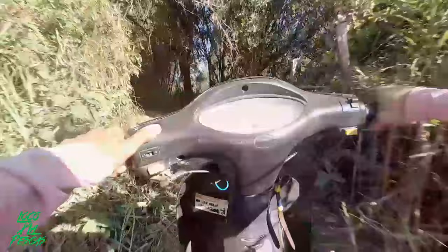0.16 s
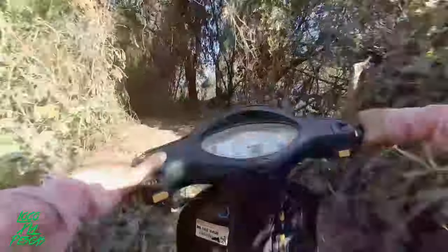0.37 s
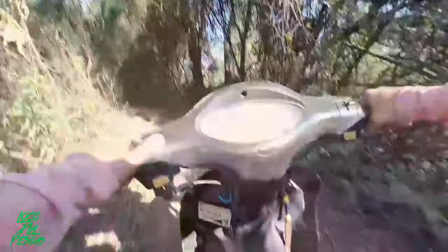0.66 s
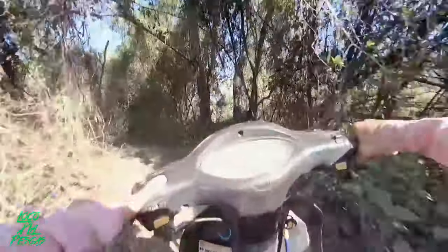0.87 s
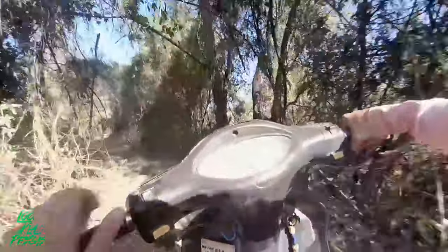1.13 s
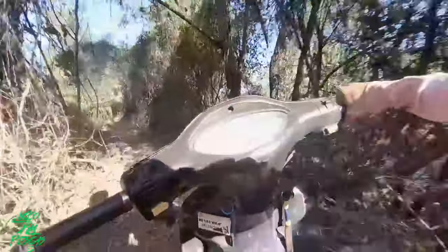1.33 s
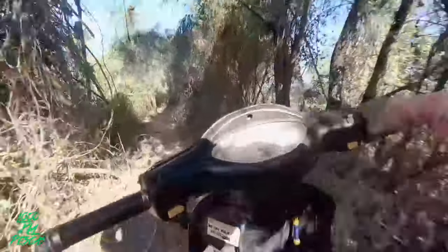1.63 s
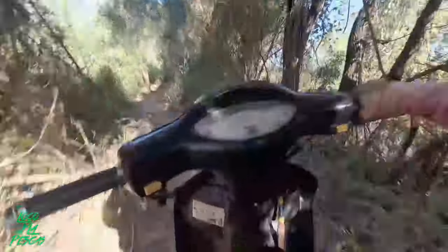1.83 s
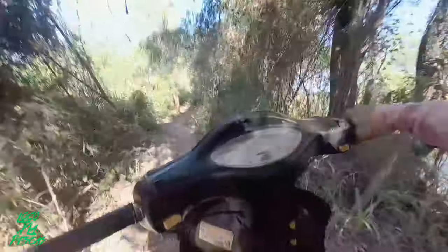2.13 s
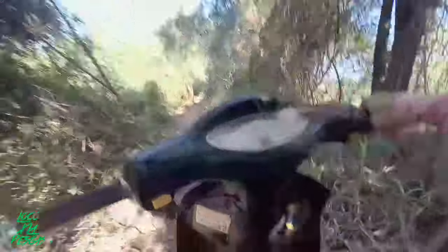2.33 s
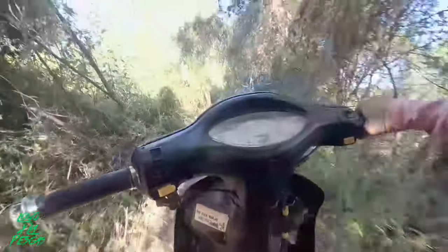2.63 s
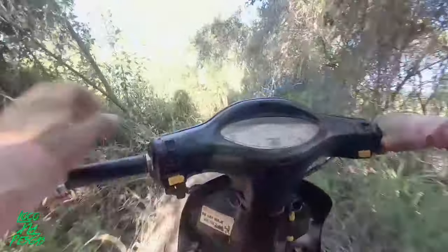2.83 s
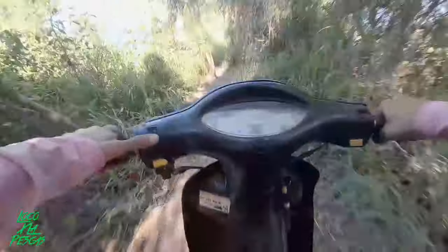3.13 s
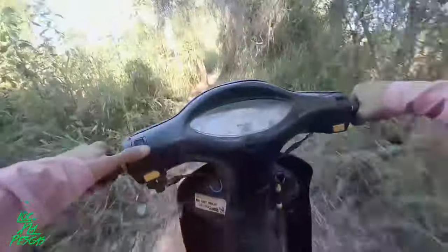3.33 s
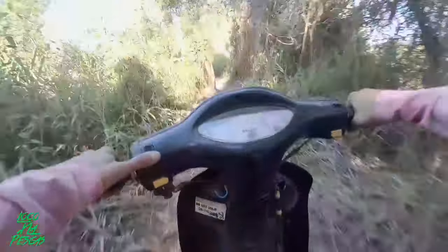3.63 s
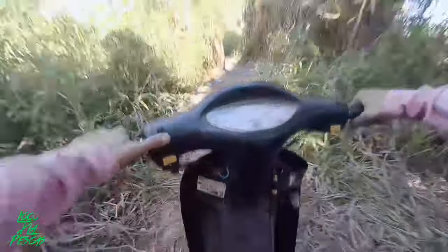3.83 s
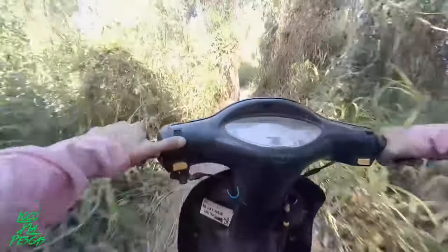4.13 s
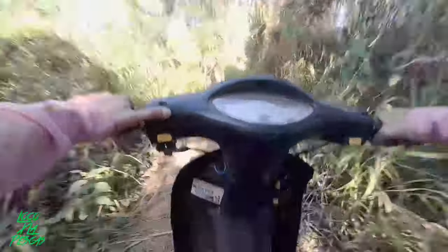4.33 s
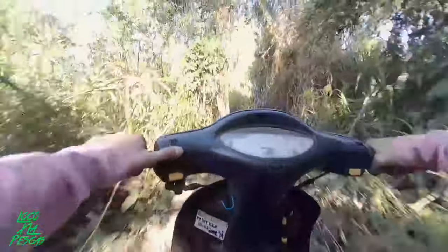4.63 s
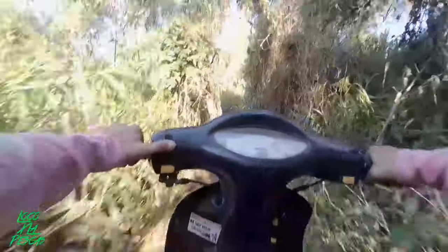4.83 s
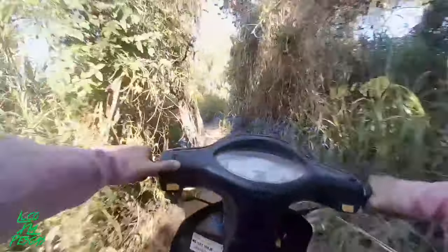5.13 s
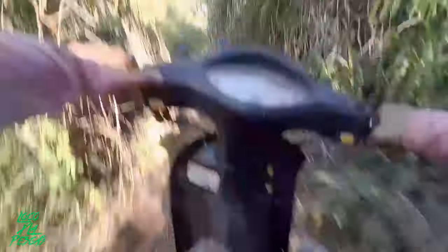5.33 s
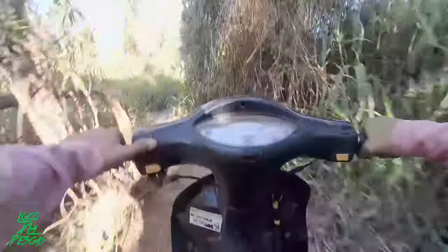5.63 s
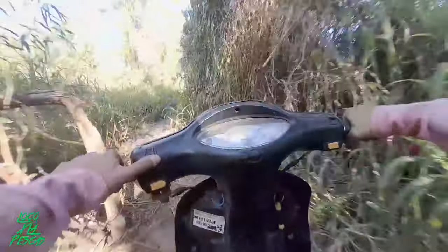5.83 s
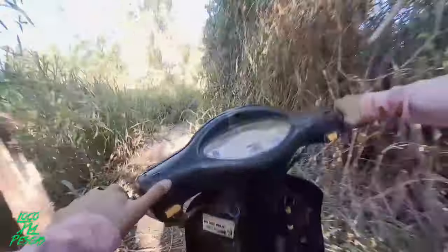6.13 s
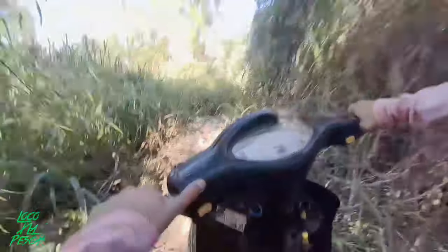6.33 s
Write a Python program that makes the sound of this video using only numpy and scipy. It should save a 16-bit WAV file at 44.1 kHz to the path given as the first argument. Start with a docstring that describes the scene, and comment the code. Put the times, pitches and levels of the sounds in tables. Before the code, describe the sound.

A small four-stroke scooter putters along an overgrown dirt track, heard close up from the rider's chest. Low exhaust thumps, rumbling tyres, hissing dry grass and jingling loose metal run throughout. In the first half second the engine slows, with a few booming beats and hollow panel knocks. It falters around 0.6 seconds and again near 1.6, where twigs snap and a bump shakes the panels. From 2 seconds the engine speeds up, holding until about 3, when ruts bring a cluster of knocks and branches swish past. It then sinks back gradually, with more swishes and bright snaps around 4.4 seconds and a sharp snap and knock at 5.2. The engine rises again from about 5.8 seconds to the end at 6.5. Faint, very high squeaks come now and then. The right side is muffled and boomy, while the brush sounds crisper on the left.

```python
"""A small four-stroke scooter putters along an overgrown dirt track, heard from the rider's chest.
From the start, each firing thumps the exhaust, tyres rumble, dry grass hisses and loose metal jingles.
As the engine slows, a few firings nearly fail, twigs snap, bumps shake the panels, branches swish past
and something squeaks faintly. The engine speeds up after two seconds, sinks back, and speeds up again
near the end. All along, the right microphone is muffled and boomy."""
import sys
import numpy as np
from scipy import signal
from scipy.fft import rfft, irfft
from scipy.io import wavfile

SR = 44100
rng = np.random.default_rng(int(sys.argv[2]) if len(sys.argv) > 2 else 0)


def log_audio(samples):
    """Write samples as a 16-bit WAV file to the path given in sys.argv[1]."""
    # one column per channel
    frames = np.atleast_2d(samples).T
    # limit to full scale, then quantise
    limited = np.clip(frames, -1, 1)
    pcm = np.round(limited * 32767).astype(np.int16)
    wavfile.write(sys.argv[1], SR, pcm)


N = 286209
TIME = np.arange(N) / SR

# How fast the engine runs. Each row: time in seconds, firings per second.
ENGINE_SPEED = [(0.0, 22.73), (0.3, 17.59), (0.46, 15.8), (1.52, 16.18), (1.58, 14.14), (2.08, 14.2),
                (2.3, 18.18), (2.7, 20.78), (3.14, 20.42), (3.4, 17.61), (4.06, 18.6), (4.68, 15.72),
                (5.42, 14.24), (5.6, 16.18), (5.72, 14.33), (6.04, 18.14), (6.1, 16.55), (6.49, 21.7)]
# Firings that burn harder and boom. Each row: time in seconds, relative boom level in dB.
HEAVY_FIRINGS = [(.07, -6), (.16, -8), (.27, -13), (.82, -11), (.95, -10), (2.0, -27), (5.33, -12)]
# The tone of plants rubbing the fairing (the plastic shell). Each row: frequency in Hz, gain in dB.
PLANT_TONE = [(400, -10), (1000, -5.5), (1500, 2.5), (1850, -5), (2300, 2.5), (3000, -1), (4000, -2.5),
              (4800, -2.5), (5600, -3), (6400, -6), (7500, -12.5), (8800, -20), (11500, -11.5),
              (15500, -14)]
# Branches whipping past. Each row: peak time in seconds, half-width in seconds, relative level in dB.
BRANCHES = [(.27, 0.019, -44.5), (.52, 0.013, -47.5), (1.6, .02, -56), (1.815, 0.038, -42.5),
            (2.403, 0.011, -37), (2.58, 0.022, -44), (2.95, .016, -43), (3.07, 0.015, -44),
            (3.22, 0.013, -47), (4.34, 0.016, -41.5), (4.46, 0.014, -46), (4.6, 0.015, -48.5),
            (5.254, 0.025, -38.5), (5.38, 0.024, -41)]


def from_db(db):
    """Turn decibels into a number to multiply by."""
    return 10 ** (np.asarray(db) / 20)


def unit_power(x):
    """Scale a signal so its average power is 1."""
    return x / np.sqrt(np.mean(x ** 2) + 1e-20)


def curve(rows):
    """Join rows of time and value with straight lines."""
    return np.interp(TIME, *np.transpose(rows))


def drift(rate_hz):
    """A slow random wander, about 1 in size."""
    pole = np.exp(-80 * np.pi * rate_hz / SR)
    slow = signal.lfilter([1], [1, -2 * pole, pole * pole], rng.standard_normal(N // 40 + 2002))[2000:]
    return np.interp(np.arange(N) / 40, np.arange(len(slow)), unit_power(slow))


def tone_gains(tone, size):
    """Spread rows of Hz and dB into one gain for each frequency of a spectrum."""
    hz, db = np.transpose(tone)
    bins = np.maximum(np.arange(size // 2 + 1) * SR / size, 1)
    return from_db(np.interp(np.log(bins), np.log(hz), db))


def click_response(tone, size=4096):
    """How a body with this tone answers one click."""
    cepstrum = irfft(np.log(tone_gains(tone, size)))
    # folding onto the first half keeps any sound from coming before the click
    cepstrum[1:size // 2] *= 2
    cepstrum[size // 2 + 1:] = 0
    return irfft(np.exp(rfft(cepstrum)))


def colour(x, tone):
    """Pass a sound through a body with this tone."""
    return signal.fftconvolve(x, click_response(tone))[:N]


def ring(clicks, hz, t60):
    """Each click starts a pure note that falls by 60 dB in t60 seconds."""
    decay, angle = from_db(-60 / (t60 * SR)), 2 * np.pi * hz / SR
    return signal.lfilter([0, np.sin(angle)], [1, -2 * decay * np.cos(angle), decay ** 2], clicks + 1e-18)


def fade(clicks, t60):
    """Each click makes a level jump up, then fall by 60 dB in t60 seconds."""
    return signal.lfilter([1], [1, -from_db(-60 / (t60 * SR))], clicks + 1e-18)


def clicks_at(rows):
    """One click for each row of seconds and dB."""
    seconds, db = np.transpose(rows)
    return np.bincount(np.clip(seconds * SR, 0, N - 1).astype(int), from_db(db), N)


def grains(per_s, spread_db):
    """Tiny random contacts, many weak and a few strong."""
    sizes = from_db(spread_db * np.minimum(rng.exponential(1, N), 4))
    return unit_power(sizes * rng.choice([-1, 1], N) * (rng.random(N) < per_s / SR))


def swells(rows, stretch=1):
    """A smooth rise and fall for each row of peak time, half-width and dB."""
    return sum(from_db(db) * np.exp(-np.minimum(((TIME - peak) / (stretch * width)) ** 2, 40))
               for peak, width, db in rows)


def firings(scatter_db, heavy_db):
    """One click per engine cycle, as strong as the throttle allows; some falter, some burn harder."""
    # How far the throttle is open. Each row: time in seconds, firing strength in dB.
    throttle = [(0.0, -2), (0.45, -7), (1.3, -2.5), (1.86, -1), (2.05, 3), (2.6, 2), (3.3, -2.5),
                (3.8, -.5), (4.25, -2), (5.0, -1.2), (5.65, -0.5), (5.88, 3), (6.15, .5), (6.49, 4)]
    # Firings that nearly fail. Each row: time in seconds, change of strength in dB.
    misfires = [(.02, -1.5), (.11, -6.5), (.385, -5), (.57, -4.5), (.64, -7), (.70, -5), (1.58, -13.5),
                (1.715, -9.5), (3.31, -7.5), (5.2, -8)]
    cycles = np.cumsum(curve(ENGINE_SPEED)) / SR
    at = np.flatnonzero(np.diff(np.floor(cycles + .5)))
    db = curve(throttle)[at] + scatter_db * rng.standard_normal(N)[at]
    for when, change_db in misfires:
        db[np.argmin(abs(at / SR - when))] += change_db
    for when, _ in HEAVY_FIRINGS:
        db[np.argmin(abs(at / SR - when))] += heavy_db
    return clicks_at(np.transpose([at / SR, db]))


def exhaust(fired, scatter_db, sway_db, left_lead_s):
    """Each firing makes the silencer ring, never twice quite alike."""
    # The silencer's notes. Each row: pitch in Hz, level in dB, ring time in seconds,
    # left level minus right level in dB.
    notes = [(89.4, -14, 0.12, -11), (121.6, -3.5, 0.14, -17.5), (205.9, -5, 0.033, -14),
             (246.9, -15, 0.099, -11), (250.9, -29, 0.31, -2)]
    left, right = np.zeros((2, N))
    for k, (hz, db, t60, left_db) in enumerate(notes):
        pushes = fired * from_db(db + scatter_db * rng.standard_normal(N))
        note = (-1) ** k * ring(pushes, hz, t60)  # neighbouring notes swing opposite ways
        # the swaying rider shades the left microphone more or less
        left += from_db(left_db + sway_db * drift(7.8)) * note
        right += note
    # the valve opens gradually, so the thump has no sharp edge
    soften = signal.butter(2, 700, fs=SR, output="sos")
    return signal.sosfilt(soften, [np.interp(TIME + left_lead_s, TIME, left), right])


def boom(fired, usual_db, db_per_speed, left_db):
    """Puffs of gas carry more deep bass when the engine runs slowly; heavy ones get an extra push."""
    at = np.flatnonzero(fired)
    speed = curve(ENGINE_SPEED)
    pushes = fired * from_db(usual_db + db_per_speed * (speed - speed.mean()))
    for when, db in HEAVY_FIRINGS:
        pushes[at[np.argmin(abs(at / SR - when))]] += from_db(db)
    # the deep swell of gas builds up just behind the pipe's ringing
    bass_band = signal.butter(2, [55, 120], "band", fs=SR, output="sos")
    deep = signal.sosfilt(bass_band, ring(pushes, hz=79.5, t60=.05))
    return np.array([from_db(left_db) * deep, deep])


def chuff(fired, level_db, rise_s, t60):
    """Gas noise and engine clatter swell after each firing and die away."""
    # The tone of the gas and clatter. Each row: frequency in Hz, gain in dB.
    gas_tone = [(40, -45), (150, -16.5), (350, 15), (600, 2.5), (1000, -20), (2200, -10), (4000, -14),
                (9000, -69)]
    flow = fade(fade(fired, rise_s), t60)
    return from_db(level_db) * unit_power(flow * colour(rng.standard_normal(N), gas_tone))


def ground_db(smooth_track_db=-43.5):
    """How hard the tyres drum: the even track plus a swell over each rut."""
    # Ruts and roots. Each row: peak time in seconds, half-width in seconds, relative level in dB.
    ruts = [(.08, 0.11, -38), (.3, 0.085, -38.5), (.92, 0.034, -42.5), (1.61, 0.023, -37.5),
            (2.05, 0.34, -46.5), (2.54, 0.034, -42), (2.99, 0.079, -35.5), (3.22, 0.084, -40),
            (4.17, 0.16, -40), (5.3, 0.065, -39)]
    return 20 * np.log10(np.hypot(from_db(smooth_track_db), swells(ruts)))


def tyre_rumble(gain_db, lumpy_db):
    """Tyres drum on the dirt and set the bodywork trembling."""
    # The tone of tyres and bodywork. Each row: frequency in Hz, gain in dB.
    rumble_tone = [(20, -30), (60, 6.5), (130, -6), (230, 4), (275, -6), (340, 1.5), (420, -2.5), (520, -1),
                   (650, -7.5), (950, -15.5), (1450, -24), (1900, -24.5), (4000, -44.5)]
    contacts = grains(per_s=3000, spread_db=2.0) * from_db(lumpy_db * drift(11.0))
    return from_db(ground_db() + gain_db) * unit_power(colour(contacts, rumble_tone))


def plants_db():
    """How hard plants press on the fairing: the grass plus the leaves of each branch."""
    # How thickly grass crowds the track. Each row: time in seconds, relative level in dB.
    grass = [(0.0, -53), (1.2, -56.5), (2.2, -51.5), (2.8, -56), (3.3, -51.5), (3.9, -53.5), (4.5, -50.5),
             (5.1, -52.5), (5.75, -52.5), (6.2, -55.5), (6.49, -54)]
    leaves = from_db(-6.5) * swells(BRANCHES, stretch=2.02)  # softer and longer than the branch's whip
    return 20 * np.log10(np.hypot(from_db(curve(grass)), leaves))


def grass_hiss(gain_db, crackle_db, clump_db):
    """Blades of grass hiss along the fairing in clumps while dry stalks crackle."""
    rub = rng.standard_normal(N) + from_db(crackle_db) * grains(per_s=610, spread_db=2.5)
    # each stalk catches at once and slides off
    catches = unit_power(fade(grains(per_s=130, spread_db=1.5) ** 2, t60=0.043))
    clumps = from_db(clump_db * catches.clip(0, 4))
    return from_db(plants_db() + gain_db) * unit_power(colour(rub * clumps, PLANT_TONE))


def leaf_fizz(level_db, follow, uneven_db):
    """Fine leaves add a thin, high fizz that changes less than the coarse grass."""
    pressure_db = plants_db()
    rub = rng.standard_normal(N) + grains(per_s=250, spread_db=0.5)
    thin = signal.sosfilt(signal.butter(4, 11500, "high", fs=SR, output="sos"), rub)
    change_db = follow * (pressure_db - pressure_db.mean()) + uneven_db * drift(8.7)
    return from_db(level_db + change_db) * unit_power(thin)


def metal_rattle(level_db, uneven_db, follow_plants, follow_ground):
    """Loose fittings jingle all the time, harder where plants hit and over the ruts."""
    # Loose metal parts. Each row: pitch in Hz, relative level in dB, ring time in seconds.
    fittings = [(1183, 2, 0.022), (1453, 2.5, 0.022), (2157, 1.5, 0.02), (2446, -2, 0.011),
                (2950, -8.5, 0.012), (4660, -1, 0.054), (5060, 2.5, 0.008), (6350, 0.5, 0.013)]
    shake_db = follow_plants * plants_db() + follow_ground * ground_db()
    jingle = np.zeros(N)
    for hz, db, t60 in fittings:
        strength = from_db(db + uneven_db * drift(3.2))
        jingle += strength * unit_power(ring(grains(per_s=140, spread_db=2.0), hz, t60))
    return from_db(level_db + shake_db - shake_db.mean()) * unit_power(jingle)


def blows(rows, tone, gain_db, t60):
    """Each blow is a short burst of noise through the struck body."""
    chatter = rng.standard_normal(N) * fade(clicks_at(rows), t60)
    return from_db(gain_db) * colour(chatter, tone) / np.linalg.norm(click_response(tone))


def twig_snaps(gain_db, t60):
    """Twigs and grit strike the bodywork with a bright snap."""
    # The strikes. Each row: start in seconds, relative level in dB.
    strikes = [(0.118, -48), (1.5263, -53), (1.5808, -47), (1.6013, -48), (1.6631, -50), (2.3296, -47),
               (2.4877, -44.5), (2.9287, -66), (3.5563, -51), (3.906, -46.5), (4.1599, -48.5),
               (4.3939, -43), (4.504, -47), (5.243, -38.5), (5.4924, -45), (5.624, -44), (5.8207, -44.5),
               (5.944, -48), (6.4307, -45.5)]
    # The tone of a snap. Each row: frequency in Hz, gain in dB.
    snap_tone = [(500, -26), (2300, -1), (3800, 2), (5000, 9.5), (6400, 3.5), (8500, -11), (12000, -4),
                 (15500, -17)]
    return blows(strikes, snap_tone, gain_db, t60)


def panel_knocks(gain_db, t60):
    """Bumps shake the panels with a hollow knock."""
    # The bumps. Each row: start in seconds, relative level in dB.
    bumps = [(0.126, -35.5), (0.273, -26.5), (1.606, -33.5), (2.98, -30), (3.019, -38), (3.073, -33),
             (3.203, -36), (5.244, -37)]
    # The tone of the panels. Each row: frequency in Hz, gain in dB.
    panel_tone = [(120, -58), (350, 1), (750, 11.5), (1100, -1.5), (2400, -0.5), (4000, -30), (9000, -37)]
    return blows(bumps, panel_tone, gain_db, t60)


def branch_swishes(gain_db):
    """A branch drags over the plastic as a short rush of tiny contacts."""
    rub = colour(grains(per_s=4300, spread_db=1.5), PLANT_TONE)
    return from_db(gain_db) * swells(BRANCHES) * unit_power(rub)


def squeaks(gain_db, hz, t60):
    """Light rubbing makes metal sing one high note in short swells."""
    # The rubs. Each row: peak time in seconds, half-width in seconds, relative level in dB.
    rubs = [(0.549, 0.061, -51), (1.595, 0.023, -52), (3.06, .02, -49), (3.89, 0.031, -52),
            (4.11, 0.041, -54), (4.73, 0.037, -54)]
    return from_db(gain_db) * swells(rubs) * unit_power(ring(rng.standard_normal(N), hz, t60))


def two_mics(source, alike, lag_s=.00025):
    """Left and right hear partly the same sound; the right one is later and muffled."""
    # The covered right microphone. Each row: frequency in Hz, gain compared with the left in dB.
    covered_tone = [(60, 5.5), (250, 1), (500, -7.5), (1000, -9), (1500, -15), (2300, -25.5), (3200, -18),
                    (3900, -24.5), (4550, -10), (5600, -30), (6400, -27), (8800, -23), (15000, -27)]
    left = source()
    right = np.sqrt(alike) * np.roll(left, round(lag_s * SR)) + np.sqrt(1 - alike) * source()
    return np.array([left, irfft(rfft(right) * tone_gains(covered_tone, N), N)])


def scene():
    """Add up engine, ground, plants and metal at the two microphones."""
    fired = firings(scatter_db=0.32, heavy_db=1.5)
    engine = exhaust(fired, scatter_db=1.04, sway_db=2.5, left_lead_s=0.00014)
    engine += boom(fired, usual_db=-27, db_per_speed=-6.5, left_db=-17)
    engine += two_mics(lambda: chuff(fired, level_db=-48.5, rise_s=0.055, t60=0.11), alike=0.25)
    ground = two_mics(lambda: tyre_rumble(gain_db=8.0, lumpy_db=-0.57), alike=0.17)
    ground += two_mics(lambda: panel_knocks(gain_db=-1.5, t60=0.17), alike=0.18)
    plants = two_mics(lambda: grass_hiss(gain_db=5.5, crackle_db=-6, clump_db=4.0)
                      + branch_swishes(gain_db=0.5), alike=.05)
    plants += two_mics(lambda: leaf_fizz(level_db=-58.5, follow=.4, uneven_db=1.4), alike=.05)
    plants += two_mics(lambda: twig_snaps(gain_db=5.5, t60=0.099), alike=.05)
    metal = two_mics(lambda: metal_rattle(level_db=-51.0, uneven_db=3.0, follow_plants=0.87,
                                          follow_ground=0.28), alike=0.11)
    metal += two_mics(lambda: squeaks(gain_db=-4.0, hz=12100, t60=0.0098), alike=.1)
    return engine + ground + plants + metal


def record(dry):
    """Turn the deepest bass down gently and cut the highest treble steeply."""
    low_cut_hz, high_cut_hz = 74, 15750
    lean = signal.sosfilt(signal.butter(1, low_cut_hz, "high", fs=SR, output="sos"), dry)
    return signal.sosfilt(signal.ellip(12, .1, 80, high_cut_hz, fs=SR, output="sos"), lean)


dry = scene()
out = record(dry)
log_audio(out)
```